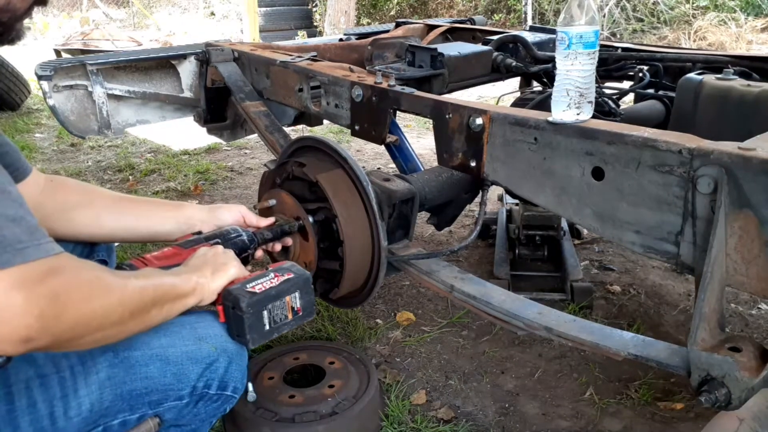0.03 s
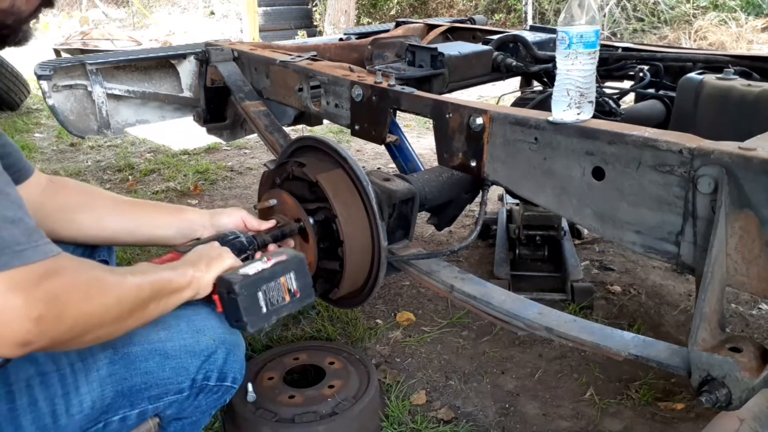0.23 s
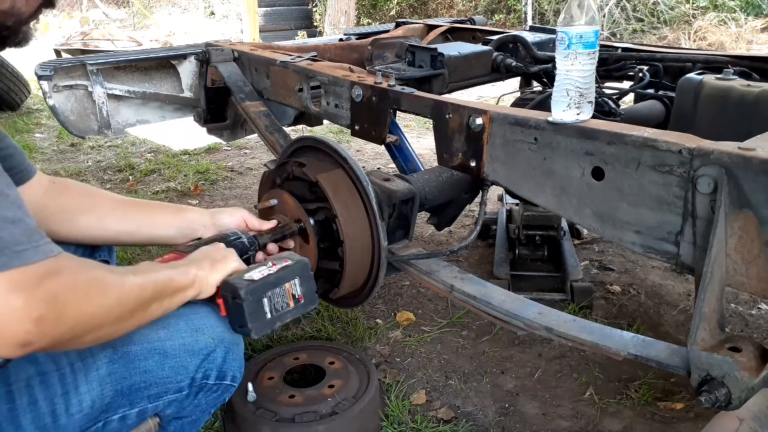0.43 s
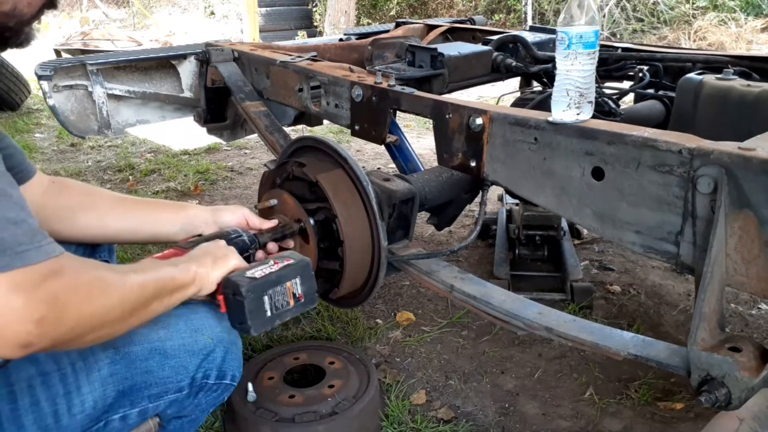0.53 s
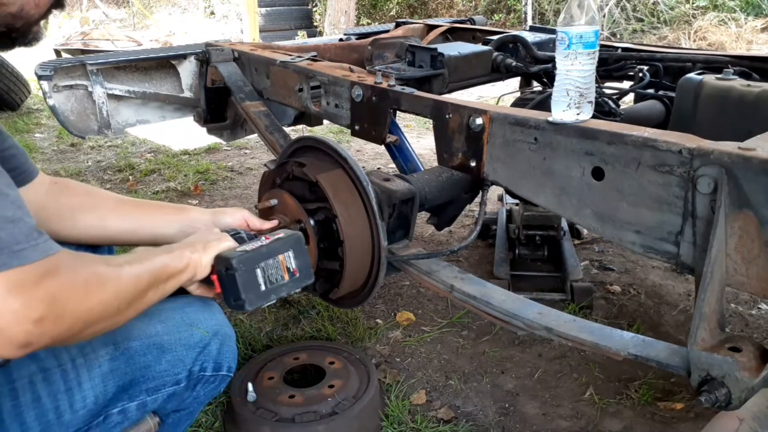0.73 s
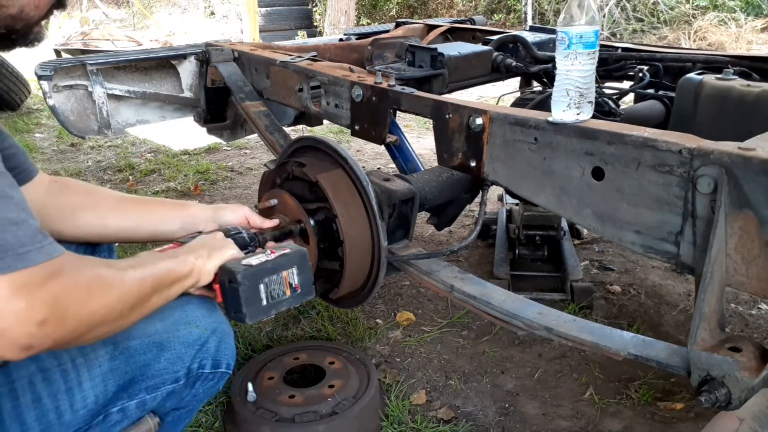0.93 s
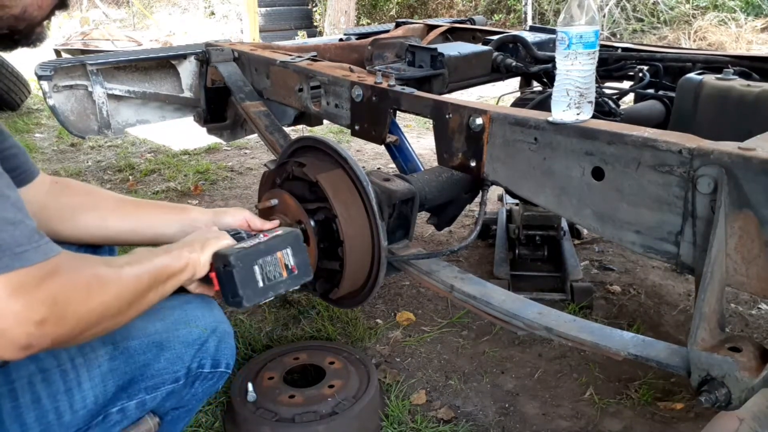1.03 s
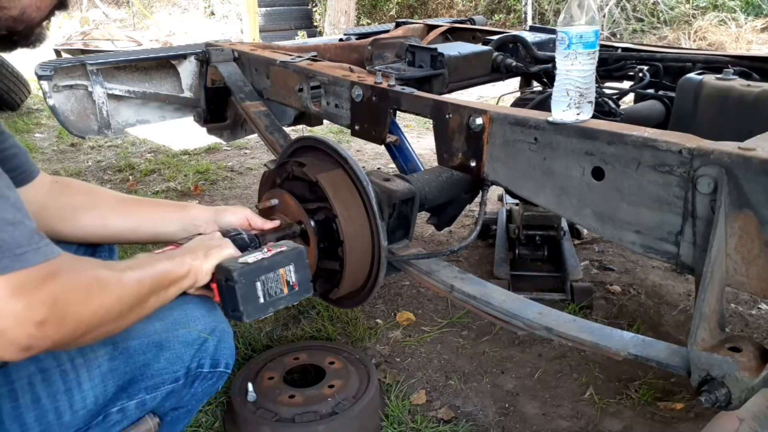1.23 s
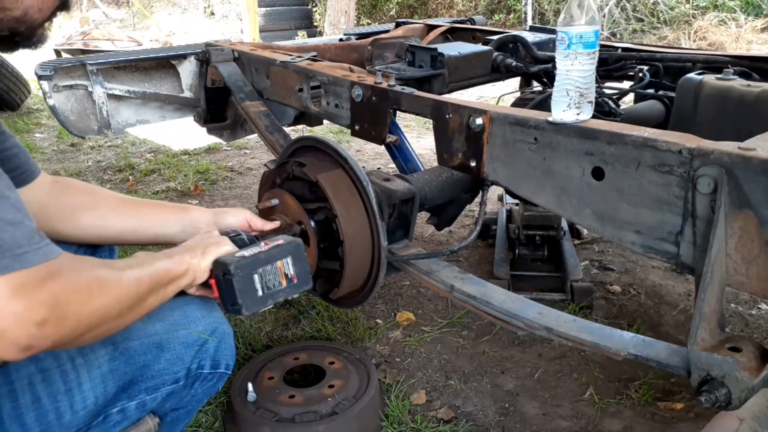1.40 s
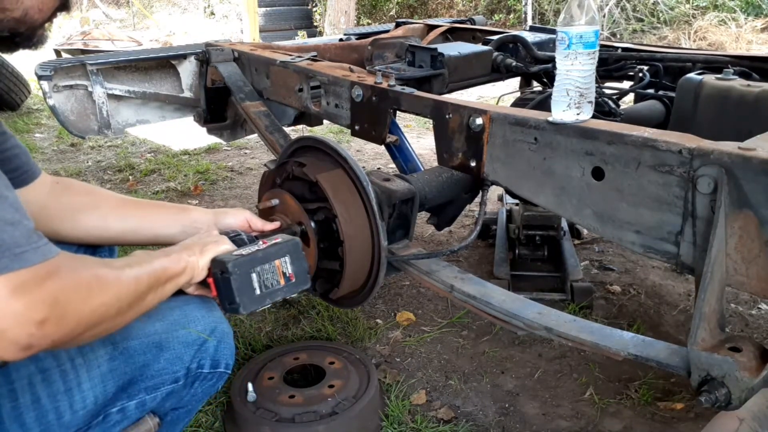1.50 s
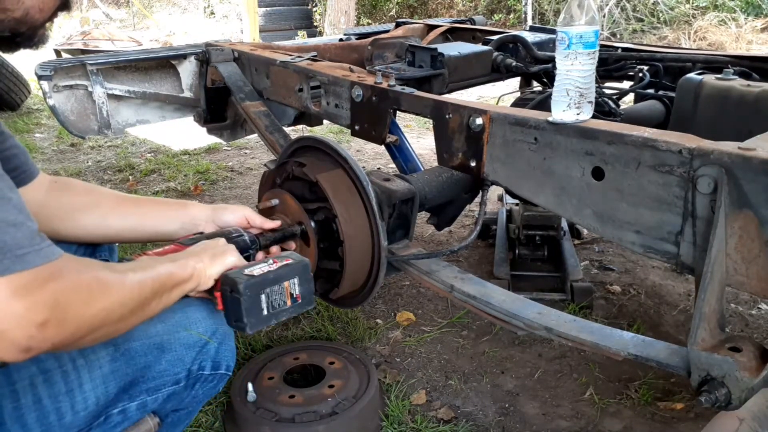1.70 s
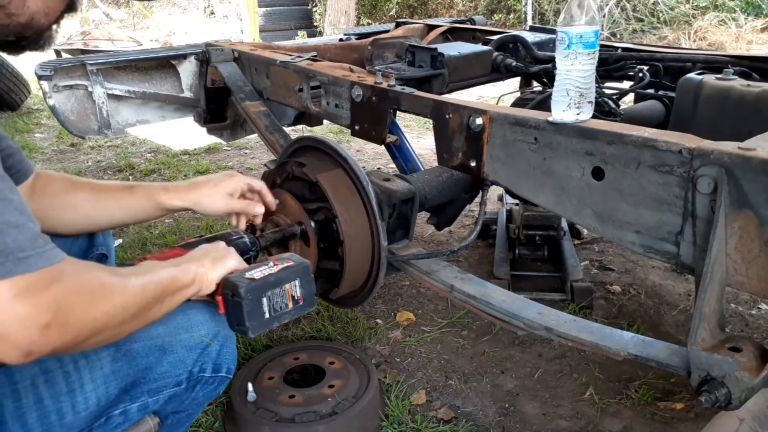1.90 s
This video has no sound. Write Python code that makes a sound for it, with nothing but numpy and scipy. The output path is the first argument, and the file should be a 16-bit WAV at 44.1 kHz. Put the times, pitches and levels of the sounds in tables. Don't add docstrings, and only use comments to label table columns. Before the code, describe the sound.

A cordless impact wrench is triggered four times on a rusty hub: each pull clicks, whirs up, then hammers in a few sharp metallic blows before stopping. Close stereo microphone outdoors, faint low hum behind.

```python
import sys
import numpy as np
from scipy import signal
from scipy.fft import rfft, irfft, next_fast_len
from scipy.io import wavfile
from scipy.ndimage import uniform_filter1d

SR = 44100
rng = np.random.default_rng(int(sys.argv[2]) if len(sys.argv) > 2 else 0)


def persist_wave(psi):
    counts = np.round(np.clip(psi, -1, 1) * 32767).astype(np.int16)
    wavfile.write(sys.argv[1], SR, np.atleast_2d(counts).T)


def convert_level_to_amplitude(level_db):
    exponent = np.asarray(level_db, float) / 20
    return 10 ** exponent


N = 85995
RIGHT_LAG_S = 0.00014


def evened(x):
    return x / np.sqrt(np.mean(x ** 2) + 1e-20)


def read(points, hz):
    f, value = np.transpose(points)
    return np.interp(np.log(hz + 1), np.log(f + 1), value)


def colour(x, points):
    n = next_fast_len(x.shape[-1])
    gain = convert_level_to_amplitude(read(points, np.fft.rfftfreq(n, 1 / SR)))
    return irfft(rfft(x, n) * gain, n)[..., :x.shape[-1]]


def split_off(x, hz, side, order=4):
    return signal.sosfilt(signal.butter(order, hz, side, fs=SR, output="sos"), x)


def resonate(x, hz, width):
    r, w = np.exp(-np.pi * width / SR), 2 * np.pi * hz / SR
    return signal.lfilter([(1 - r * r) / 2, 0, -(1 - r * r) / 2], [1, -2 * r * np.cos(w), r * r], x)


def add(mix, s, sound):
    part = mix[..., round(s * SR):][..., :sound.shape[-1]]
    part += sound[..., :part.shape[-1]]


# f/Hz, likeness 0-1
LIKENESS = [(60, .9), (300, 0.87), (1500, 0.62), (4000, 0.14), (15000, 0.15)]


def ears():
    left, other = rfft(rng.standard_normal((2, N)))
    hz = np.fft.rfftfreq(N, 1 / SR)
    same = np.clip(read(LIKENESS, hz), 0, 1)
    late = np.exp(-2j * np.pi * hz * RIGHT_LAG_S)
    return irfft([left, same * left * late + np.sqrt(1 - same ** 2) * other], N)


# f/Hz, level/dB
FAR_HUM = [(53.8, -63.5), (118.4, -43), (236.9, -56.5)]
# f/Hz, level/dB
YARD_AIR = [(32, -25.5), (55, -7.5), (130, -12.5), (300, -21), (560, -23), (1500, -30.5), (6700, -46.5),
            (9000, -42), (16000, -56.5)]


def yard():
    t = np.arange(N) / SR
    waver = convert_level_to_amplitude(0.8 * evened(uniform_filter1d(rng.standard_normal(N), size=2000)))
    hum = np.zeros(N)
    for hz, db in FAR_HUM:
        tone = np.sqrt(2) * np.sin(2 * np.pi * hz * t) * waver
        fuzz = evened(resonate(resonate(rng.standard_normal(N), hz, 14), hz, 14))
        hum += convert_level_to_amplitude(db) * (tone + convert_level_to_amplitude(-15) * fuzz)
    air = convert_level_to_amplitude(-50.5) * evened(colour(ears(), YARD_AIR))
    duck = np.clip((t - 0.3) / 0.06, 0, 1)
    return hum * convert_level_to_amplitude(-9.5 * duck) + air * convert_level_to_amplitude(-5 * duck)


# f/Hz, t60/s
REFLECTION_DECAY = [(100, 0.12), (350, 0.62), (1000, 0.25), (2000, 0.32), (8000, 0.3), (15000, 0.2)]


def room(x):
    taps = np.zeros((2, SR // 2))
    slots = np.arange(300, SR // 2 - 20, 20)
    at = slots + rng.integers(0, 20, (2, len(slots)))
    np.put_along_axis(taps, at, rng.choice([-1., 1.], at.shape), 1)
    hz, t, bands = signal.stft(taps, SR, nperseg=256)
    decay = convert_level_to_amplitude(-60 * t / read(REFLECTION_DECAY, hz)[:, None])
    tail = signal.istft(bands * decay, SR, nperseg=256)[1]
    return signal.fftconvolve(x, tail / np.linalg.norm(tail[0]), axes=1)[:, :N]


# t/s, level/dB, f/Hz, fade/s
HOUSING_KNOCKS = [
    (.195, -29.5, 2200, 0.0012),
    (1.0445, -25, 2050, 0.004),
    (1.4127, -26, 1540, 0.0019),
    (1.5785, -11, 896, 0.0019),
    (0.87, -16, 730, 0.0014),
]


def knocks():
    u, out = np.arange(1500) / SR, np.zeros(N)
    for s, db, hz, fade in HOUSING_KNOCKS:
        ring = 1.16 * np.sin(2 * np.pi * hz * u) + 0.46 * np.sin(2 * np.pi * 0.57 * hz * u)
        add(out, s, convert_level_to_amplitude(db) * ring * np.exp(-u / fade) * np.minimum(u / 0.00074, 1))
    return np.array([out, np.roll(out, round(RIGHT_LAG_S * SR))])


# f/Hz, width/Hz, level/dB
HUB_MODES = [(1688, 120, -0.5), (2000, 99, -8.5), (2400, 100, -5), (3753, 22, -3), (4126, 50, -3),
             (4970, 260, -0.5), (8700, 250, -4), (9300, 250, -8.5), (10150, 260, -8.5), (11140, 120, -5),
             (12300, 250, -7.5), (14400, 270, -7), (15300, 190, 3)]


def hub(x, stretch):
    ring = 0
    for hz, width, db in HUB_MODES:
        ring = ring + convert_level_to_amplitude(db) * resonate(x, hz, width * stretch) * np.sqrt(100 / width)
    return ring


# press t/s, full-speed t/s, release t/s, motor level/dB, whine level/dB
TRIGGER_PULLS = [
    (0.185, 0.245, 0.42, -29.5, -50),
    (0.67, 0.749, 0.91, -31, -50),
    (1.006, 1.077, 1.285, -30.5, -49.5),
    (1.409, 1.475, 1.68, -27.5, -46),
]
SPIN_START_DB = [-0.5, -18.5, -13.5, -16.5]
FREE_RUN_DB = [-1.5, 1.5, 0.5, -5.5]
# f/Hz, level/dB
GEAR_MESH = [(120, -12), (200, 0), (1000, -2.5), (1230, -10), (2750, 8), (6520, -11.5), (8900, -4.5),
             (14900, -6), (16000, -42.5)]


def ticks(per_s, spread_db, most):
    strength = convert_level_to_amplitude(spread_db * np.minimum(rng.exponential(1, N), most))
    return strength * (rng.random(N) < per_s / SR)


def motor():
    whine_hz, whine_s = 1900, 0.04
    t = np.arange(N) / SR
    level, speed, whine = np.zeros((3, N))
    for pull, start_db, free_db in zip(TRIGGER_PULLS, SPIN_START_DB, FREE_RUN_DB):
        press, full, release, db, whine_db = pull
        spin_up = np.clip((t - press) / (full - press), 0, 1)
        coast = np.maximum(t - release, 0)
        run_db = db + start_db * (1 - spin_up) ** 2.5 + free_db * (t < full)
        level += np.clip((t - press) / 0.015, 0, 1) * convert_level_to_amplitude(run_db - 230 * coast)
        speed = np.maximum(speed, spin_up * np.exp(-coast / 0.051))
        whine_on = np.clip((t - press) / 0.0083, 0, 1)
        whine += whine_on * convert_level_to_amplitude(whine_db) * np.clip((press + whine_s - t) / 0.0073, 0, 1)
    air = ears()
    teeth = uniform_filter1d(ticks(2400, 1, 4), size=16)
    chatter = uniform_filter1d(ticks(470, 3, 3), size=30)
    mesh = evened(colour(air * (0.12 + teeth), GEAR_MESH))
    mesh = evened(mesh + convert_level_to_amplitude(-4) * evened(hub(air * chatter, 1)))
    dull = split_off(mesh, 2600, "low")
    bright = convert_level_to_amplitude(-18 * (1 - speed))
    buzz = 0.2 * evened(resonate(rng.standard_normal(N), whine_hz + 100, 250))
    tone = np.sqrt(2) * np.sin(2 * np.pi * whine_hz * t)
    return level * ((1 - bright) * dull + bright * mesh) + whine * (tone + buzz)


# t/s, clatter level/dB, thump level/dB, treble level/dB
HAMMER_BLOWS = [(0.2584, -14.5, -36.5, -3.5), (0.2814, -19.0, -31.5, 0.5), (0.3049, -24.5, -13.5, 3),
                (0.3372, -23, -26, 3.5), (0.3756, -20.5, -27.5, -2), (0.7598, -20.0, -28.5, -1.5),
                (0.794, -20, -23, -0.5), (0.8272, -20, -31, 0), (0.864, -24.5, -29, 9),
                (1.0888, -21, -30.5, -1.5), (1.1227, -20.5, -24.5, 4.5), (1.1556, -20.0, -30, -2),
                (1.1891, -19, -24, 0), (1.226, -22, -29, 6), (1.4725, -17.5, -27, -2),
                (1.5146, -21.5, -32, -1.5), (1.5457, -24, -24, 5), (1.5779, -21.5, -17.5, 0.5),
                (1.6112, -18, -27, -1.5), (1.6437, -19.5, -49, -1.5), (1.6899, -27.0, -36, -7)]
AIR_LEAN_DB = [3, 4, 3.5, -4]


def thumps():
    u, out = np.arange(4000) / SR, np.zeros((2, N))
    slowing = np.sin(np.pi * (u / 0.0017) ** 0.53)
    swing = slowing * (np.exp(-u / 0.012) + 1.43 * np.exp(-u / 0.00091))
    for s, _, db, _ in HAMMER_BLOWS:
        pull_number = sum(s > pull[0] for pull in TRIGGER_PULLS) - 1
        lean = AIR_LEAN_DB[pull_number]
        add(out, s + 0.00048, -convert_level_to_amplitude([[db + lean / 2], [db - lean / 2]]) * swing)
    return out


# t/s, clatter level/dB, treble level/dB
CAM_SLIPS = [(0.2914, -17.5, -5), (0.329, -25, 2.5), (0.3664, -18.5, 3), (0.7861, -21.5, 3.0),
             (0.819, -25.5, 4.5), (0.8564, -18.5, -4.5), (1.1134, -18, 0.5), (1.1464, -22, -3.5),
             (1.1804, -21.5, -2.5), (1.2164, -20.5, -2), (1.5045, -20.0, 1), (1.5384, -28, -4),
             (1.5704, -28.5, 4.5), (1.6034, -24.0, -0.5), (1.6564, -18.5, 2)]
# t/s, clatter level/dB, treble level/dB
GEAR_CLICKS = [
    (.2069, -31, -15.5),
    (.7385, -32.5, -2.5),
    (.7484, -38, -2.5),
    (1.0241, -34.5, 3.5),
    (1.0623, -38, 0.5),
    (1.4586, -36, -7.5),
]
# f/Hz, level/dB
STEEL_CLATTER = [(200, -27), (550, -10), (1100, -5), (2070, -1.5), (6520, -10.5), (10000, -0.5),
                 (12900, -1.5), (14500, 1), (16000, -16)]
# f/Hz, level/dB, t60/s
DRUM_MODES = [(665, -5, 0.69), (782, -20.5, 1), (1068, -8.5, 1), (1500, -17.5, .4)]


def clatter():
    rattle_s, rattle_fade_s, treble_hz = 0.0032, 0.00071, 6150
    u, power = np.arange(4000) / SR, np.zeros((2, N))
    kinds = ((HAMMER_BLOWS, 0.0004, -0.1, 1), (CAM_SLIPS, 0.001, -3.5, 1.16), (GEAR_CLICKS, 0.0004, -3, 1))
    for events, rise_s, trim_db, stretch in kinds:
        rattle = convert_level_to_amplitude(-5 * u / rattle_s / stretch ** 2)
        rattle *= np.exp(-np.maximum(u / stretch - rattle_s, 0) / rattle_fade_s)
        settling = convert_level_to_amplitude(-8.5) * np.exp(-u / 0.023)
        shape = np.minimum(u / rise_s, 1) * (rattle + settling)
        for event in events:
            db = event[1] + trim_db
            add(power, event[0], (convert_level_to_amplitude([[db], [db + event[-1]]]) * shape) ** 2)
    rough = convert_level_to_amplitude(1.96 * evened(uniform_filter1d(rng.standard_normal(N), size=16)))
    steel = colour(ears(), STEEL_CLATTER) * rough
    hit = evened(split_off(steel, treble_hz, "low")) * np.sqrt(power[0])
    hit = hit + evened(split_off(steel, treble_hz, "high")) * np.sqrt(power[1])
    drum = sum(convert_level_to_amplitude(db) * evened(resonate(hit, hz, 1.9 / t60)) for hz, db, t60 in DRUM_MODES)
    return hit + np.std(hit) * (convert_level_to_amplitude(-14.5) * evened(hub(hit, 2.7)) + convert_level_to_amplitude(-28) * drum)


def scene():
    tool, push = clatter() + motor() + knocks(), thumps()
    reflections = room(convert_level_to_amplitude(-13.5) * tool + convert_level_to_amplitude(-12.5) * push)
    return tool + push + reflections + yard()


def roll_off(x):
    return signal.sosfilt(signal.butter(12, 16650, fs=SR, output="sos"), x)


# f/Hz, level/dB
MIC_LEAN = [(60, 2.5), (240, 4), (950, 5.5), (3770, 2), (15000, 2.5)]


def record(dry):
    left = colour(dry[0], [(hz, db / 2) for hz, db in MIC_LEAN])
    right = colour(dry[1], [(hz, -db / 2) for hz, db in MIC_LEAN])
    mix = np.tanh(split_off(np.array([left, right]), 38, "high", order=2))
    band_limit = signal.firwin(255, 15600, window=("kaiser", 7), fs=SR)
    mix = signal.oaconvolve(mix, band_limit[None], "same")
    return roll_off(mix)


dry = scene()
out = record(dry)
persist_wave(out)
```